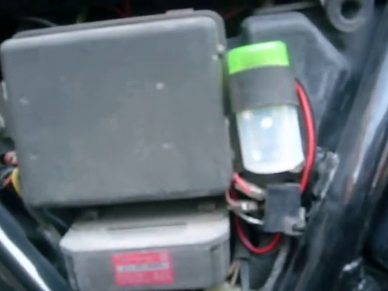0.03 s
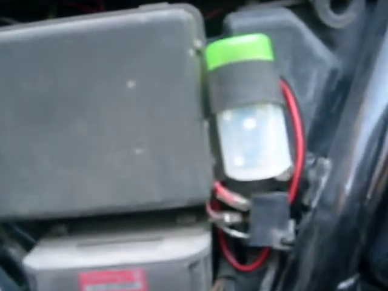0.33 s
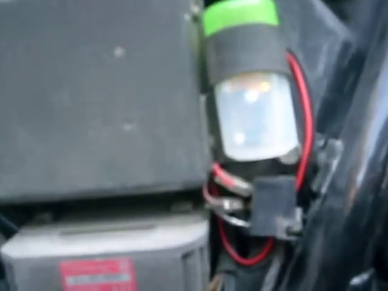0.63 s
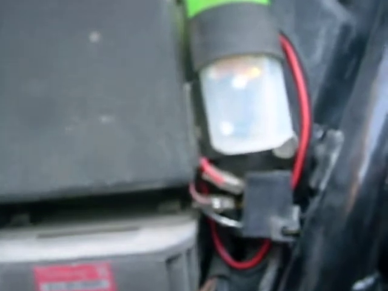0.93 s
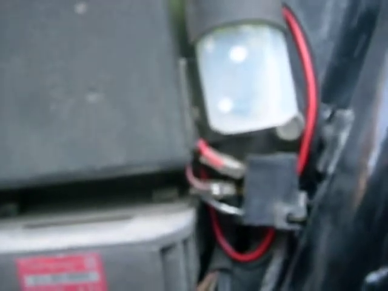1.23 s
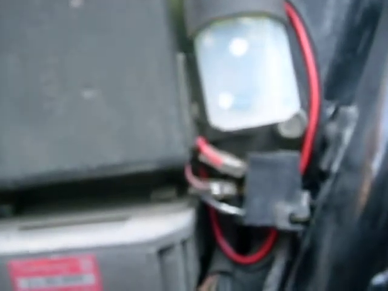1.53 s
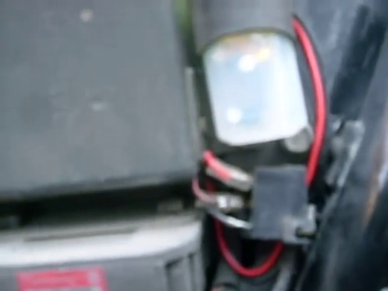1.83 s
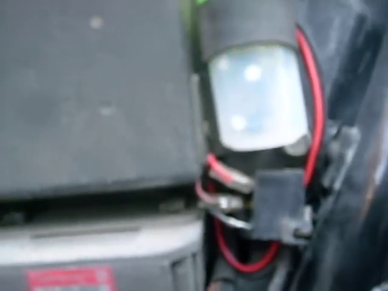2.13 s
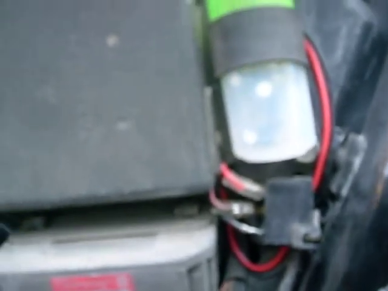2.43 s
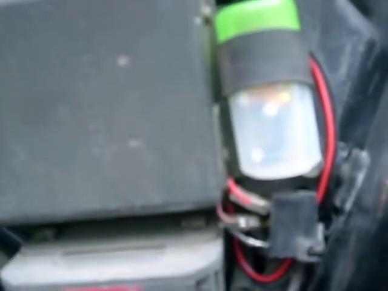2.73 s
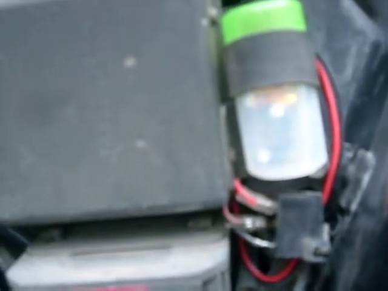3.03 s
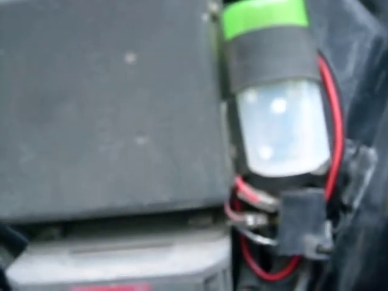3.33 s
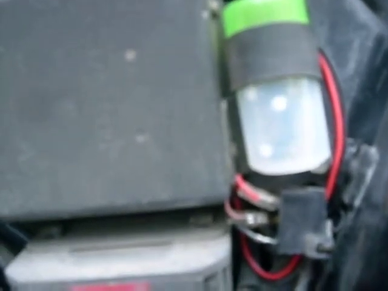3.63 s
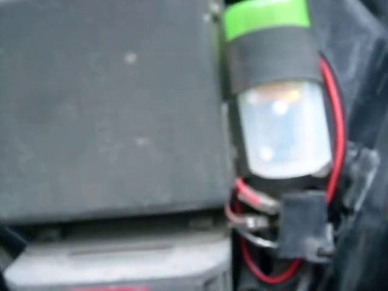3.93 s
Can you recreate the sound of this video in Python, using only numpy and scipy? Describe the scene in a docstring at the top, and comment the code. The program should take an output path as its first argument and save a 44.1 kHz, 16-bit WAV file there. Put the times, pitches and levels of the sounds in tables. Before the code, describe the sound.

Close to the microphone in a workshop, a small relay snaps sharply with a short knock from its case. Faint ticks and rustles follow, then a softer second click, all over a steady low rumble and hum.

```python
"""A small flasher relay, close by in a workshop. Steady low room noise opens the scene, with a soft drone
that is strongest at the start. At 0.18 s the relay clicks, dry and loud: its contacts give a bright
snap, then its case gives a short knock. Tiny ticks and faint high rustles follow, just above the room
noise. At 2.5 s the relay clicks again, more softly, and a few more ticks and rustles run to the end."""
import sys
import numpy as np
from scipy import signal
from scipy.fft import rfft, irfft
from scipy.io import wavfile

SR = 44100
rng = np.random.default_rng(int(sys.argv[2]) if len(sys.argv) > 2 else 0)


def transcribe(u):
    """Save the signal u as a 16-bit wav file named by the first command-line argument.

    u: samples, shape (n,) or (channels, n), limited to [-1, 1]; the rate is SR.
    q: integer samples, one column per channel.
    """
    v = np.clip(np.atleast_2d(u).T, -1, 1)
    q = np.round(v * 32767).astype(np.int16)
    wavfile.write(sys.argv[1], SR, q)


N = 176400
T = np.arange(N) / SR

# Tone colour of the room's rumble and midrange air. Each row: frequency in Hz, relative level in dB.
RUMBLE_SPECTRUM = [(12, -19.5), (25, -1.5), (60, -1.5), (95, 0), (135, -2.5), (170, -3.5), (300, -6),
                   (450, -9.5), (620, -13), (1000, -39.5), (2000, -59.5)]
AIR_SPECTRUM = [(200, -22), (450, -3), (620, -3.5), (760, 1), (980, -3), (1200, -9), (1500, -12.5),
                (1900, -18), (2400, -20.5), (3000, -23.5), (4300, -29.5), (7000, -43)]
# Fader moves of the rumble, the drone and its undertone. Each row: time in seconds, level in dB.
RUMBLE_FADER = [(0, -41), (0.6, -41), (1.2, -41), (1.9, -41), (2.5, -41), (2.9, -40), (3.4, -40.5),
                (3.58, -43.5), (3.98, -43)]
DRONE_FADER = [(0, -41.5), (0.05, -34), (0.2, -39.5), (0.4, -40.5), (0.7, -46.5), (1.0, -50), (1.27, -43),
               (1.7, -51.5), (2.25, -44.5), (2.6, -51.5), (3.1, -45), (3.6, -51), (3.98, -43.5)]
UNDERTONE_FADER = [(0, -49), (0.5, -45), (0.8, -45.5), (1.1, -54), (2.0, -58), (2.8, -48.5), (3.3, -54),
                   (3.98, -53.5)]
# Slow drift of the air. Each row: time in seconds, level in dB relative to AIR_DB.
AIR_DRIFT = [(0, 1), (0.6, 0), (1.0, 0.5), (1.4, 0), (1.9, 0.5), (2.3, -.5), (2.8, -0.5), (3.3, -1),
             (3.98, -2.5)]
# Faint rustles. Each row: midpoint in seconds, length in seconds, centre in Hz, width in Hz, level in dB.
HIGH_RUSTLES = [(0.338, 0.046, 2450, 1400, -56), (0.687, 0.052, 2290, 450, -58.5),
                (0.896, 0.033, 3250, 450, -57), (1.19, 0.28, 3950, 700, -67), (1.217, .2, 2400, 700, -63.5),
                (3.28, 0.03, 3980, 500, -62), (3.356, 0.012, 3760, 600, -56),
                (3.583, 0.048, 3000, 1400, -60), (3.683, 0.052, 2530, 450, -60.5),
                (3.888, .03, 2400, 400, -59.5)]
# Tiny ticks. Each row: start in seconds, peak level in dB, centre in Hz, width in Hz.
DRY_TICKS = [(0.1289, -31.5, 2150, 1200), (0.3330, -43, 2500, 1500), (0.3479, -41, 2400, 1500),
             (0.463, -43.5, 3000, 3500), (0.5943, -47, 5200, 3000), (1.4038, -42, 4200, 5000),
             (1.6610, -44, 3200, 3500), (1.7291, -39, 3250, 1000), (1.8271, -41, 3800, 5000),
             (2.16, -42, 3300, 5050), (2.2252, -35.5, 3200, 5000), (2.5037, -44, 5500, 3000),
             (2.5258, -38, 3600, 5430), (2.8621, -37, 3300, 5500), (3.237, -44, 5000, 3500),
             (3.3944, -40, 3300, 5000), (3.6263, -40, 3600, 5500)]
# Modes rung by the snap. Each row: frequency in Hz, relative gain in dB, 60 dB decay time in seconds.
SNAP_RESONANCES = [(990, -3, 0.01), (1517, -3.5, 0.015), (3286, 2.5, .011), (3380, -3, 0.0069),
                   (4000, -1, 0.0085), (4810, -6, .010), (6150, -19.5, 0.0094), (6650, -13.5, .008),
                   (7250, -18, .007)]
# The relay's clicks. Each row: start in seconds, gains of snap, clack and knock in dB,
# knock pitch in Hz, the knock's 60 dB decay time in seconds.
RELAY_CLICKS = [(0.1776, -18, -20, -9, 736, 0.021), (2.5080, -27.5, -40, -23.5, 950, 0.0087)]

AIR_DB, HISS_DB = -47.5, -59.5
DRONE_HZ, DRONE_WIDTH_HZ = 237.8, 42.4
UNDERTONE_HZ, UNDERTONE_WIDTH_HZ = 159, 34.7
SNAP_RISE_S, KNOCK_LAG_S, KNOCK_RISE_S = 0.0014, 0.00229, 0.00046
GRIT_DB, GRIT_T60_S = -9, 0.0039   # grit of the contacts meeting, relative to the snap's gain
CLACK_HZ, CLACK_T60_S = 2120, 0.015
KNOCK_LOW_HZ = 633   # the small case radiates little below this
TOP_ROLL_HZ, CUTOFF_HZ = 6700, 7550


def from_db(db):
    """Decibels to gain."""
    return 10 ** (np.asarray(db) / 20)


def rms_one(x):
    """Scale to rms 1."""
    return x / np.sqrt(np.mean(x ** 2) + 1e-20)


def fader(rows):
    """Gain over time, gliding between points in seconds and dB."""
    return from_db(np.interp(T, *np.transpose(rows)))


def band(hz, width_hz):
    """Band-pass filter around a centre."""
    edges = [max(hz - width_hz / 2, 20), hz + width_hz / 2]
    return signal.butter(2, edges, "band", fs=SR, output="sos")


def coloured_noise(spectrum):
    """Steady noise with a given tone colour, at rms 1."""
    hz, db = np.transpose(spectrum)
    bin_hz = np.maximum(np.arange(N // 2 + 1) * SR / N, 1)
    eq = from_db(np.interp(np.log(bin_hz), np.log(hz), db))
    return rms_one(irfft(rfft(rng.standard_normal(N)) * eq, N))


def narrow_noise(hz, width_hz):
    """Noise in one narrow band, at rms 1."""
    return rms_one(signal.sosfilt(band(hz, width_hz), rng.standard_normal(N + SR))[SR:])


def room():
    """The bed: low rumble, a midrange rush of air, a wavering drone in two bands and an even hiss."""
    rumble = fader(RUMBLE_FADER) * coloured_noise(RUMBLE_SPECTRUM)
    air = from_db(AIR_DB) * fader(AIR_DRIFT) * coloured_noise(AIR_SPECTRUM)
    drone = fader(DRONE_FADER) * narrow_noise(DRONE_HZ, DRONE_WIDTH_HZ)
    undertone = fader(UNDERTONE_FADER) * narrow_noise(UNDERTONE_HZ, UNDERTONE_WIDTH_HZ)
    hiss = from_db(HISS_DB) * rng.standard_normal(N)
    return rumble + air + drone + undertone + hiss


def rustles():
    """Short patches of high noise that swell and fade."""
    out = np.zeros(N)
    for middle, length, hz, width_hz, db in HIGH_RUSTLES:
        swell = np.cos(np.pi * np.clip((T - middle) / length, -.5, .5))
        out += from_db(db) * narrow_noise(hz, width_hz) * swell
    return out


def ticks():
    """Each dry tick is one impulse into a heavily damped resonance."""
    out = np.zeros(N)
    for start, db, hz, width_hz in DRY_TICKS:
        tick = signal.sosfilt(band(hz, width_hz), signal.unit_impulse(512))
        first = int(start * SR)
        out[first:first + len(tick)] += from_db(db) * tick / np.abs(tick).max()
    return out


def ring(start, hz, t60, rise):
    """A struck mode: a sine with a fast attack that dies away."""
    t = np.clip(T - start, 0, 10 * t60)
    attack = 1 - np.exp(-(t / rise) ** 2)
    decay = np.exp(-np.log(1000) * t / t60)
    return np.sin(2 * np.pi * hz * t) * attack * decay


def relay():
    """The contacts snap, ringing bright modes over a duller clack; the case knocks a moment later."""
    out = np.zeros(N)
    low_cut = signal.butter(6, KNOCK_LOW_HZ, "high", fs=SR, output="sos")
    for start, snap_db, clack_db, knock_db, knock_hz, knock_t60 in RELAY_CLICKS:
        modes = sum(from_db(db) * ring(start, hz, t60, SNAP_RISE_S) for hz, db, t60 in SNAP_RESONANCES)
        grit_decay = np.exp(-np.log(1000) * np.clip((T - start) / GRIT_T60_S, 0, 10))
        grit = rng.standard_normal(N) * (T >= start) * grit_decay
        snap = modes + from_db(GRIT_DB) * grit
        clack = ring(start, CLACK_HZ, CLACK_T60_S, SNAP_RISE_S)
        case = ring(start + KNOCK_LAG_S, knock_hz, knock_t60, KNOCK_RISE_S)
        knock = signal.sosfilt(low_cut, case + 1e-18)
        out += from_db(snap_db) * snap + from_db(clack_db) * clack + from_db(knock_db) * knock
    return out


def scene():
    """The relay and the small sounds over the room bed, in mono."""
    return (relay() + ticks() + rustles() + room())[None, :]


def record(dry):
    """A narrow-band finish: the top rolls off, then meets a steep high cut."""
    roll_off = signal.butter(12, TOP_ROLL_HZ, fs=SR, output="sos")
    high_cut = signal.ellip(10, .1, 80, CUTOFF_HZ, fs=SR, output="sos")
    return signal.sosfilt(high_cut, signal.sosfilt(roll_off, dry))


dry = scene()
out = record(dry)
transcribe(out)
```